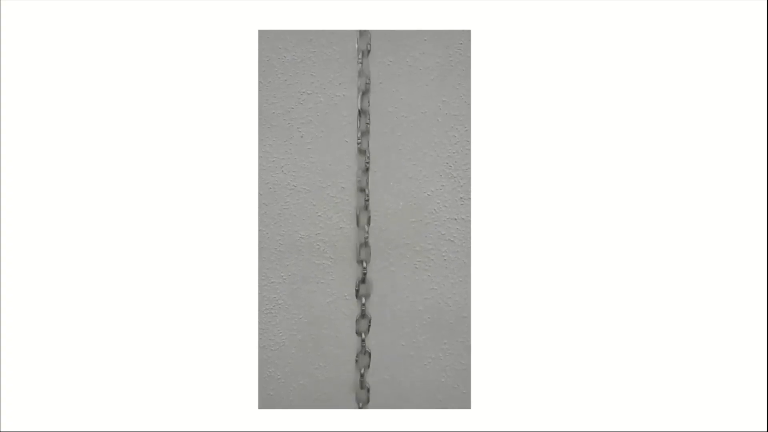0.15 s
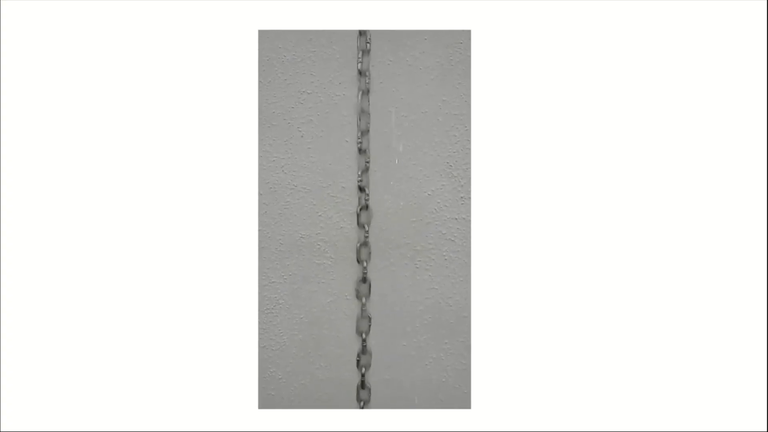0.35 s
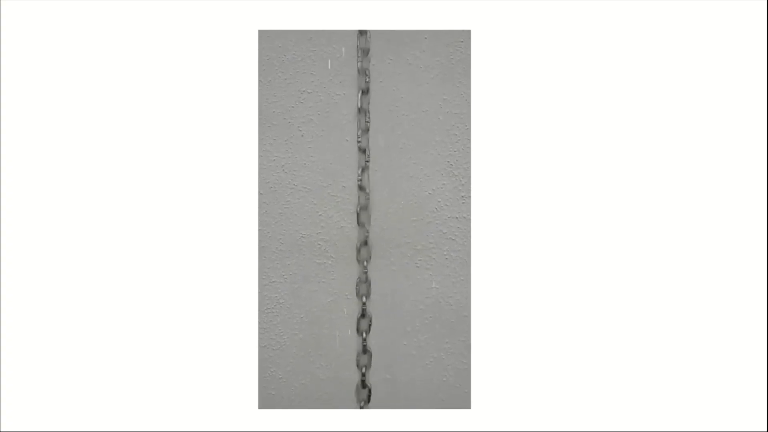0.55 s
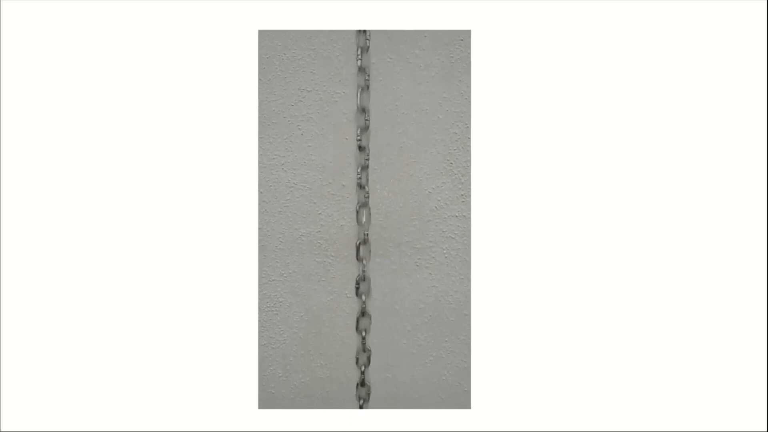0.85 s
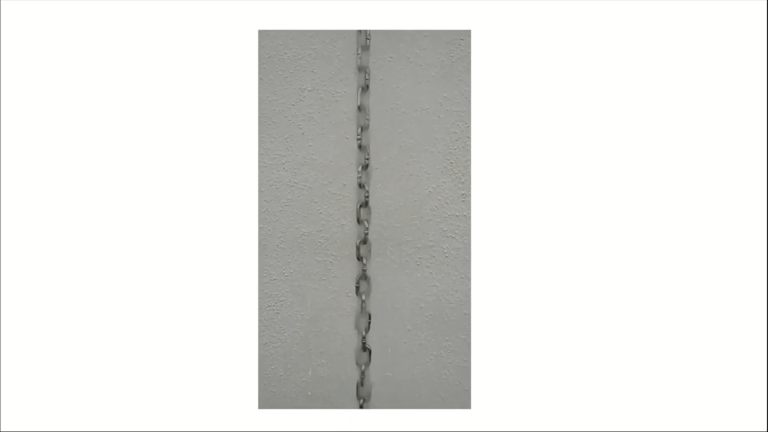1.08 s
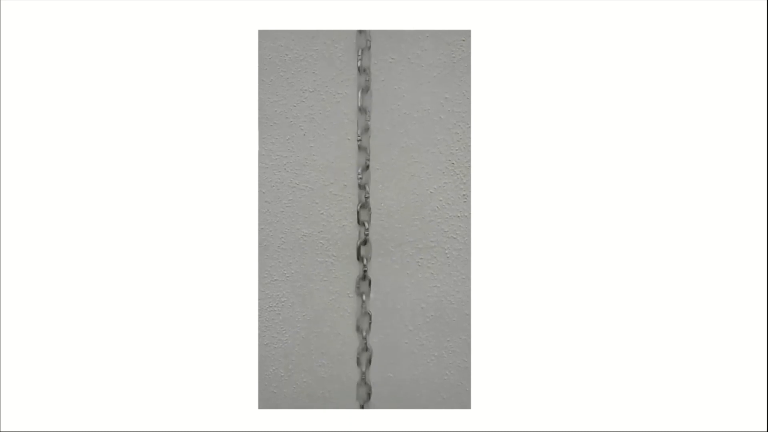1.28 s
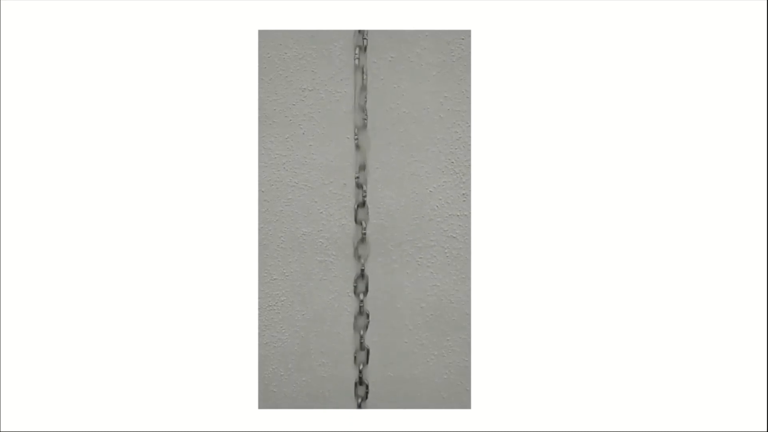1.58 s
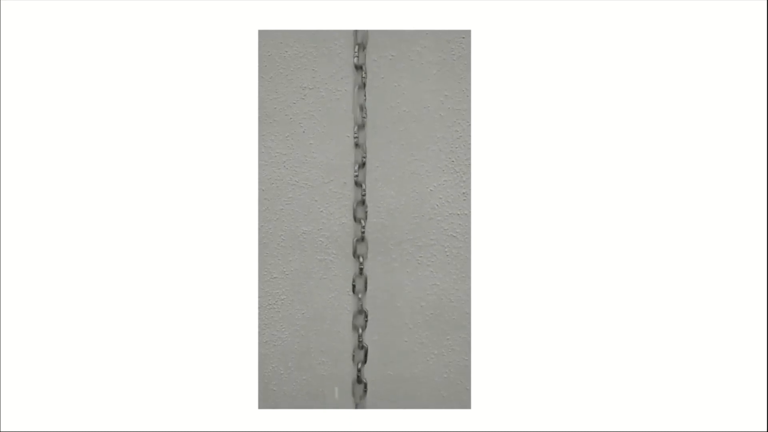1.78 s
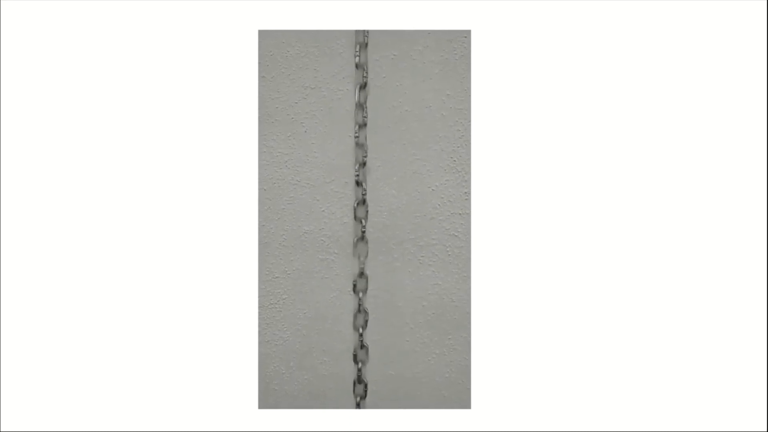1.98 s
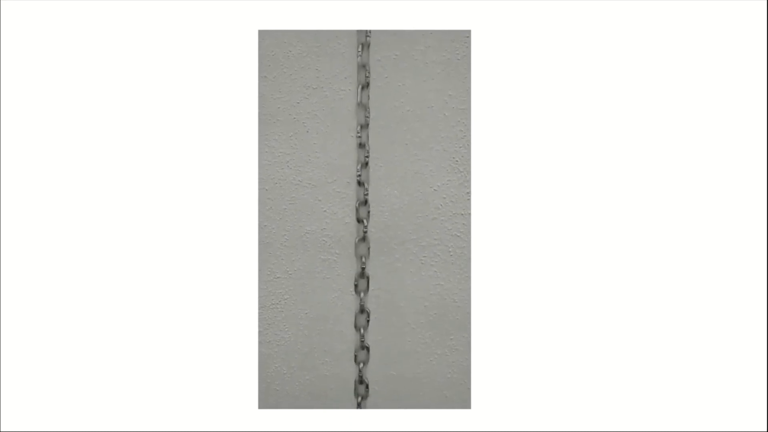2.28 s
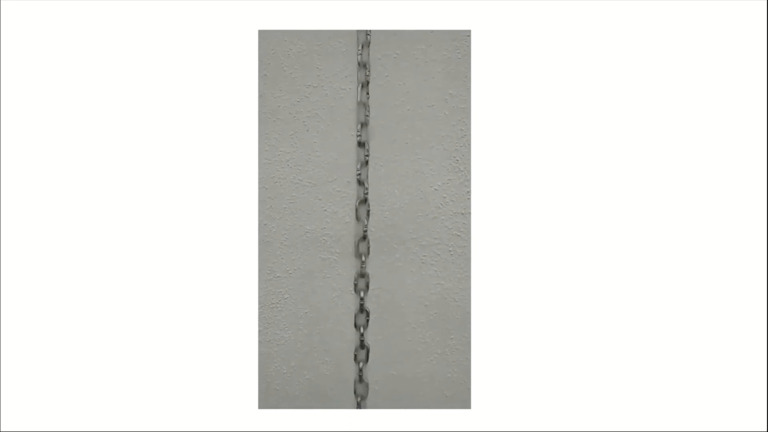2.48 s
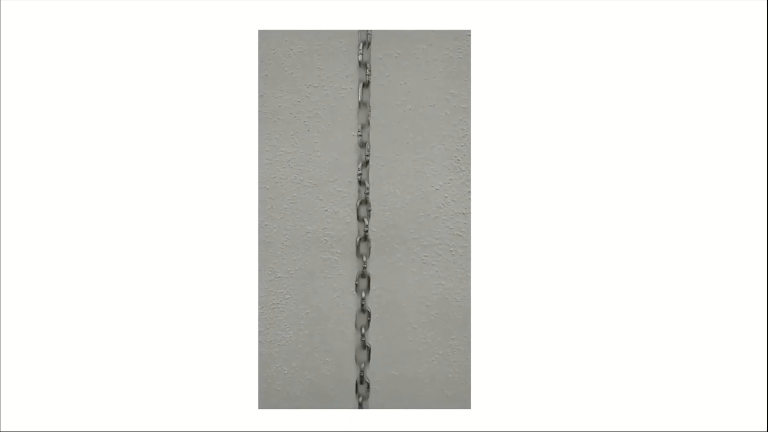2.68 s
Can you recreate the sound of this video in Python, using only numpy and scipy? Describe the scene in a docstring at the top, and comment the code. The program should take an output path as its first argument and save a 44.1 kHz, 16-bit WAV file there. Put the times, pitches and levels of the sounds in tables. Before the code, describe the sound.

Rainwater runs down a hanging metal chain, heard very close outdoors, the same in both ears. Dense, crisp spatter and rounder plops flow in quick irregular gushes, with sharp splats throughout, strong near 0.5, 0.7, 1.0, 2.0 and 2.2 seconds. Small gulps come mostly early. Soft rain and hollow drumming lie beneath. After 2.0 the plops thin out; heavier low thuds cluster around 2.35-2.65.

```python
"""Rainwater runs down a hanging metal chain, close to the microphone, outdoors; both channels are alike.
Each splat is a pop of a few cycles with a short spray behind it: dense small ones make the rush,
big ones stand out. Low gulps sound where water closes over pockets of air.
Underneath, falling water drums hollowly, with a few heavier thuds, over the soft wash of rain.
Pops are gliding, decaying sines; sprays and rain are coloured noise."""
import sys
import numpy as np
from scipy import signal
from scipy.fft import rfft, irfft, next_fast_len
from scipy.io import wavfile
from scipy.ndimage import uniform_filter1d, minimum_filter1d, map_coordinates

SR = 44100
rng = np.random.default_rng(int(sys.argv[2]) if len(sys.argv) > 2 else 0)


def transcribe(u):
    """Save the signal u as a 16-bit wav file named by the first command-line argument.

    u: samples, shape (n,) or (channels, n), limited to [-1, 1]; the rate is SR.
    q: integer samples, one column per channel.
    """
    v = np.clip(np.atleast_2d(u).T, -1, 1)
    q = np.round(v * 32767).astype(np.int16)
    wavfile.write(sys.argv[1], SR, q)


N = 125685  # samples

# Colours: noise density against frequency; only the shape counts.
# Wash of rain: frequency_hz, density_db [dB per Hz]
RAIN_COLOUR = [(25, -86), (110, 6), (350, 2.5), (550, 2), (800, -7), (1100, -11.5), (1800, 4.5),
               (4500, 5.5), (8500, -4), (12500, 1), (15000, -92)]
# Hollow drumming: frequency_hz, density_db [dB per Hz]
DRUM_COLOUR = [(25, -80), (60, -67), (85, -3), (115, -7), (155, -2), (240, 0.5), (300, -2), (380, -19.5),
               (700, -70)]
# Plops off the links: frequency_hz, density_db [dB per Hz]
PLOP_COLOUR = [(500, -16), (1130, -6.5), (1290, 3), (1850, 10.5), (2400, 5.5), (3200, -5.5), (5000, 22),
               (9000, -47)]
# Dull body of the plops: frequency_hz, density_db [dB per Hz]
LOW_SPLASH_COLOUR = [(200, -29.5), (400, 5), (600, 9), (850, 3), (1200, -57), (2500, -38)]
# Fine spatter: frequency_hz, density_db [dB per Hz]
SPATTER_COLOUR = [(1000, -19), (2000, 4), (3000, -12), (4000, -1), (4900, -1.5), (5500, -0.5), (6300, -7),
                  (7500, -5.5), (8700, -15.5), (12000, -48)]
# Mist of tiny droplets: frequency_hz, density_db [dB per Hz]
MIST_COLOUR = [(5000, -5), (7300, -2), (8700, -4.5), (9800, 6), (11500, 4.5), (12700, 2.5), (13600, -5),
               (15000, -38)]
# Spray of the big splats: frequency_hz, density_db [dB per Hz]
SPRAY_COLOUR = [(400, -15), (1050, -49.5), (1400, -9.5), (1900, 0.5), (3000, -5), (4700, -4), (6500, -13),
                (8700, -40), (11000, -8.5), (15000, -43)]

# Level of the drumming: time_s, level_db
DRUM_LEVEL = [(0, -32), (.5, -31.5), (.8, -30), (1.8, -28.5), (2.2, -30.5), (2.5, -26), (2.85, -34.5)]
# Level of the plops, the larger drops shed by the links, before the gushes: time_s, level_db
PLOP_LEVEL = [(0, -27), (.1, -29), (.22, -23), (.42, -26), (.53, -27), (.7, -24), (1.0, -28), (1.38, -21),
              (1.53, -29.5), (1.7, -24), (1.95, -28), (2.1, -38.5), (2.85, -50)]
# Level of the fine spatter, before the gushes: time_s, level_db
SPATTER_LEVEL = [(0, -26), (.22, -24), (.41, -24.5), (.49, -27), (.62, -26.5), (.87, -23), (1.1, -25),
                 (1.4, -22.5), (1.53, -23.5), (1.82, -26), (1.94, -23.5), (2.05, -29), (2.19, -27.5),
                 (2.3, -25.5), (2.66, -25.5), (2.76, -26.5), (2.85, -34)]

# Heavy low thuds, level before THUD_DB: start_s, level_db, pitch_hz
THUDS = [(0.6477, -14.5, 155), (0.7861, -14.5, 196), (0.8137, -15, 143), (2.343, -11, 143),
         (2.3853, -9.5, 154), (2.4533, -4, 166), (2.503, -11.5, 130), (2.6276, -14, 154)]
# Gulps over pockets of air, level before GULP_DB: start_s, level_db, pitch_hz, decay_s
GULPS = [(0.1678, -29, 617, 0.0041), (0.2001, -20, 670, 0.00064), (0.2679, -28, 644, 0.0025),
         (0.2817, -25, 536, 0.0027), (0.3367, -26, 700, 0.0036), (1.3517, -31, 480, 0.0053),
         (1.5871, -29.4, 610, 0.0049), (1.7591, -26.5, 631, 0.00088), (1.8786, -31, 575, 0.0034)]
# Big splats, pop level before the low cut, spray level before SPRAY_DB:
# start_s, level_db, pitch_hz, decay_s, spray_db
SPLATS = [(0.0285, -8.2, 4674, 0.002, -14), (0.1335, -12.0, 1917, 0.0035, -25),
          (0.1686, -10.9, 2211, 0.002, -18), (0.2499, -4.2, 4844, 0.0005, -19),
          (0.2823, -7.1, 1986, 0.0012, -21), (0.3394, -4.9, 4053, 0.0005, -18),
          (0.412, -10.2, 1850, 0.002, -23), (0.4563, -11.7, 2133, 0.002, -20),
          (0.4671, 2, 4000, 0.0005, -13), (0.6946, 2.8, 4844, 0.0003, -19),
          (0.7524, -7.6, 1850, 0.0008, -26), (0.76, -8.6, 4053, 0.0012, -20),
          (0.8765, -7.0, 4200, 0.0008, -22), (0.8962, -10.5, 1722, 0.002, -15),
          (0.9831, -12.3, 4053, 0.0035, -17), (1.0114, -1.4, 4200, 0.0003, -18),
          (1.0277, -1.8, 4844, 0.0003, -15), (1.0661, -3.1, 4511, 0.0012, -13),
          (1.1458, -15.2, 1850, 0.0035, -19), (1.179, -7.4, 1785, 0.0012, -16),
          (1.2001, -9.5, 4674, 0.002, -22), (1.2291, -7.1, 4200, 0.0008, -28),
          (1.2412, -11.0, 4053, 0.0035, -16), (1.3301, -10.0, 1917, 0.002, -19),
          (1.366, -10.6, 5202, 0.002, -20), (1.4247, -6.1, 3158, 0.0005, -17),
          (1.5155, -6, 3600, 0.0007, -22), (1.5632, -8, 4340, 0.002, -17),
          (1.5685, -5.4, 4353, 0.0012, -20), (1.5872, -10.3, 3774, 0.002, -14),
          (1.6203, -6.6, 1850, 0.002, -16), (1.6421, -4.6, 3642, 0.0008, -18),
          (1.7095, -8.4, 3514, 0.002, -21), (1.7357, -8.3, 1441, 0.0012, -14),
          (1.7613, -2.5, 1917, 0.002, -16), (1.8784, -7.6, 4511, 0.0012, -17),
          (1.9171, -4.1, 3911, 0.0012, -16), (1.9843, -10.2, 2460, 0.0012, -21),
          (2.0352, 1.5, 2650, 0.0005, -12), (2.063, -12.9, 3911, 0.002, -22),
          (2.1791, -0.5, 3900, 0.0008, -9), (2.2357, -6.7, 1986, 0.002, -12),
          (2.3817, -8.8, 3272, 0.0008, -20), (2.3899, -9.5, 5391, 0.0012, -21),
          (2.4622, -5.9, 3911, 0.0008, -17), (2.592, -5.4, 5020, 0.0008, -25),
          (2.6857, -9.6, 4200, 0.0012, -19), (2.7246, -5.4, 2133, 0.0008, -12),
          (2.7346, 0.1, 4844, 0.0003, -21), (2.8195, -10.3, 4844, 0.0012, -23)]

POP_GLIDE = 0.0045  # share by which a pop's pitch rises per decay time
POP_ATTACK_CYCLES = 0.64
RAIN_DB = -28.5
THUD_DB, THUD_DECAY_S, THUD_ATTACK_CYCLES = -1.5, 0.0084, 1.07
THUD_GLIDE = -0.011  # the pitch of a thud sinks
GULP_DB = 3
PLOP_SPRAY_DB, SPATTER_SPRAY_DB, TICK_SPRAY_DB = 3.5, 3, 5  # relative to their pops
LOW_SPLASH_DB = -22.5  # relative to the plops
MIST_DB, MIST_DRIFT_PER_S, MIST_DRIFT_DB = -32, 10.1, 1.8
GUSH_PER_S, GUSH_DB = 36, 1.0  # the flow comes in quick irregular gushes
SPRAY_RISE_S, SPRAY_DB = 0.00078, 2
CRACK_HZ, CRACK_DECAY_S, CRACK_DB = 4600, 0.00057, -9.5  # level relative to the pop
# a smaller droplet follows each splat; level and pitch are relative to its pop
REBOUND_S, REBOUND_DB, REBOUND_PITCH, REBOUND_DECAY_S = 0.0028, -5.5, 1.08, 0.0005
SPLAT_LOW_HZ = 1170  # drops this small radiate little below this
LIMIT, LIMIT_RELEASE_S = 0.98, 0.015  # full scale = 1; time to let go by a factor e
TOP_HZ = 15300


def undb(db):
    """Decibels to gain."""
    return 10 ** (np.asarray(db) / 20)


def unit(x):
    """Scale to rms 1."""
    return x / np.sqrt(np.mean(x ** 2))


def noise():
    """White noise of rms about 1, the raw hiss of spray and rain."""
    return rng.standard_normal(N)


def curve(rows):
    """Gain over time from (time_s, level_db) rows."""
    times, levels = np.array(rows).T
    return undb(np.interp(np.arange(N) / SR, times, levels))


def colour(x, points):
    """Causal minimum-phase filter through (frequency_hz, density_db) that keeps white noise's power."""
    size = 2 * next_fast_len(N // 2 + 4096)
    hz, db = np.array(points, float).T
    bins = np.fft.rfftfreq(size, 1 / SR)
    gain = unit(undb(np.interp(np.log(bins + 1), np.log(hz), db)))
    # folding the cepstrum forward in time makes the filter causal
    cepstrum = irfft(np.log(gain))
    cepstrum[1:size // 2] *= 2
    cepstrum[size // 2 + 1:] = 0
    return irfft(rfft(x, size) * np.exp(rfft(cepstrum)))[:N]


def walk(rate):
    """Smooth random wandering of rms 1, with the given number of knots per second."""
    knots = rng.standard_normal(1024)
    return unit(map_coordinates(knots, [np.arange(N) / SR * rate], order=3, mode="mirror"))


def add(out, start_s, x):
    """Mix x in from a given time."""
    i = int(round(start_s * SR))
    a, b = max(i, 0), min(i + len(x), N)
    if b > a:
        out[a:b] += x[a - i:b - i]


def pop(hz, decay_s, glide, turn, attack_cycles=POP_ATTACK_CYCLES):
    """A gliding ring that starts within a cycle or two and dies away; its envelope peaks at 1."""
    t = np.arange(int(decay_s * SR * 7) + 16) / SR
    attack = 1 - np.exp(-(t * hz / attack_cycles) ** 2)
    env = attack * np.exp(-t / decay_s)
    cycles = hz * t * (1 + glide * t / decay_s / 2)
    return env / env.max() * np.sin(2 * np.pi * (cycles + turn))


def pops_at(rows, attack_cycles=POP_ATTACK_CYCLES):
    """Sum of pops from (start_s, level_db, pitch_hz, decay_s, glide) rows, each of random phase."""
    out = np.zeros(N)
    for (at, db, hz, decay_s, glide), turn in zip(rows, rng.random(len(rows))):
        add(out, at, undb(db) * pop(hz, decay_s, glide, turn, attack_cycles))
    return out


def spray_shape(rise_s):
    """Spray flies up at once and thins out more slowly; the envelope peaks at 1."""
    u = np.arange(int(rise_s * SR * 7) + 2) / (rise_s * SR)
    return u * np.exp(1 - u)


def shower(count, low_hz, high_hz, cycles, spread_db, spray_s, spray_db):
    """Drops of random time, size and pitch: their pops with spray, and the envelope of the spray."""
    pops, power = np.zeros(N), np.zeros(N)
    chance = rng.random((count, 5))
    for k, (when, size, pitch, length, turn) in enumerate(chance):
        start = (k + 2 * when - 1) / count * N / SR
        gain = undb(spread_db * (size ** 2 - 1))
        hz = low_hz * (high_hz / low_hz) ** pitch
        decay_s = cycles * 2 ** (2 * length - 1) / hz  # half to twice the given cycles
        add(pops, start, gain * pop(hz, decay_s, POP_GLIDE, turn))
        add(power, start, (gain * spray_shape(spray_s * (.5 + length))) ** 2)
    spray = unit(np.sqrt(power))
    return unit(pops) + undb(spray_db) * spray * noise(), spray


def rain_wash():
    """Soft wash of rain: steady coloured noise."""
    return undb(RAIN_DB) * colour(noise(), RAIN_COLOUR)


def drumming():
    """Falling water drums on something hollow, as low short pops; now and then a heavier thud."""
    patter, _ = shower(count=300, low_hz=110, high_hz=290, cycles=1.3, spread_db=2,
                       spray_s=0.0095, spray_db=-10)
    rows = [(at, db + THUD_DB, hz, THUD_DECAY_S, THUD_GLIDE) for at, db, hz in THUDS]
    thuds = pops_at(rows, THUD_ATTACK_CYCLES)
    return curve(DRUM_LEVEL) * unit(colour(patter, DRUM_COLOUR)) + thuds


def low_gulps():
    """Water closes over a pocket of air, which rings low and dies away."""
    return pops_at([(at, db + GULP_DB, hz, decay, POP_GLIDE) for at, db, hz, decay in GULPS])


def droplet_mist(spray):
    """Tiny droplets tick and hiss at the top of the spectrum, following the spray of the spatter."""
    ticks, _ = shower(count=500, low_hz=7500, high_hz=12800, cycles=1, spread_db=15,
                      spray_s=0.0005, spray_db=TICK_SPRAY_DB)
    return unit(colour(unit(ticks) + spray * noise(), MIST_COLOUR))


def low_splash(spray):
    """Dull body of the plops: low noise under the envelope of their spray."""
    return undb(LOW_SPLASH_DB) * unit(colour(spray * noise(), LOW_SPLASH_COLOUR))


def chain_water():
    """Plops, higher and shorter spatter, and mist off the links swell together in quick gushes."""
    plops, plop_spray = shower(count=600, low_hz=1314, high_hz=2820, cycles=3.1, spread_db=6.5,
                               spray_s=0.0017, spray_db=PLOP_SPRAY_DB)
    spatter, spatter_spray = shower(count=800, low_hz=2886, high_hz=6970, cycles=2.6, spread_db=12,
                                    spray_s=0.0013, spray_db=SPATTER_SPRAY_DB)
    mist = droplet_mist(spatter_spray)
    plops = unit(colour(plops, PLOP_COLOUR)) + low_splash(plop_spray)
    flow = curve(SPATTER_LEVEL)
    near = plops * curve(PLOP_LEVEL) + unit(colour(spatter, SPATTER_COLOUR)) * flow
    # the mist swells with the spatter and wavers on its own as well
    mist_gain = unit(flow ** 1.2) * undb(MIST_DB + MIST_DRIFT_DB * walk(MIST_DRIFT_PER_S))
    return (near + mist * mist_gain) * undb(GUSH_DB * walk(GUSH_PER_S))


def big_splats():
    """Large drops burst: a ringing pop, a bright crack and a puff of spray, then a smaller droplet."""
    spray = np.zeros(N)
    pops, cracks, rebounds = [], [], []
    for at, db, hz, decay, spray_db in SPLATS:
        add(spray, at, undb(spray_db + SPRAY_DB) * spray_shape(SPRAY_RISE_S))
        pops.append((at, db, hz, decay, POP_GLIDE))
        cracks.append((at, db + CRACK_DB, CRACK_HZ, CRACK_DECAY_S, 0))
        rebounds.append((at + REBOUND_S, db + REBOUND_DB, hz * REBOUND_PITCH,
                         REBOUND_DECAY_S, POP_GLIDE))
    low_cut = signal.butter(4, SPLAT_LOW_HZ, "high", fs=SR, output="sos")
    rings = signal.sosfilt(low_cut, pops_at(pops + cracks + rebounds))
    return rings + colour(spray * noise(), SPRAY_COLOUR)


def scene():
    """Rain and gulps behind, water on the chain in front, drumming below; the same in both ears."""
    background = rain_wash() + low_gulps()
    return np.tile(background + chain_water() + big_splats() + drumming(), (2, 1))


def record(dry):
    """A limiter catches the highest peaks and lets go quickly; the deep bass and the top are cut."""
    bass_cut = signal.butter(3, 58, "high", fs=SR, output="sos")
    x = signal.sosfilt(bass_cut, dry)
    fall = np.arange(N) / SR / LIMIT_RELEASE_S
    over = np.log(np.maximum(np.abs(x[0]) / LIMIT, 1))
    held = np.maximum.accumulate(over + fall) - fall
    # the centred windows (samples) bring the gain down smoothly ahead of each peak
    gain = uniform_filter1d(minimum_filter1d(np.exp(-held), size=41), size=41)
    top_cut = signal.ellip(8, .2, 70, TOP_HZ, fs=SR, output="sos")
    return signal.sosfilt(top_cut, x * gain)


dry = scene()
out = record(dry)
transcribe(out)
```